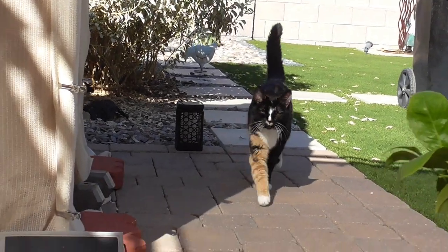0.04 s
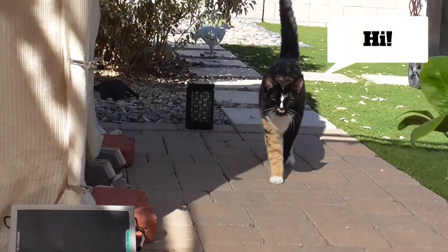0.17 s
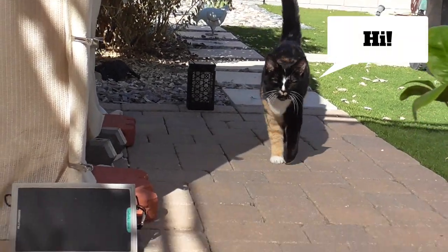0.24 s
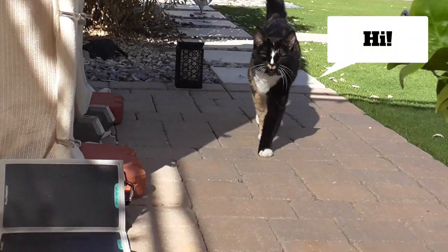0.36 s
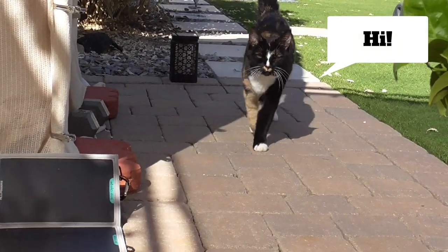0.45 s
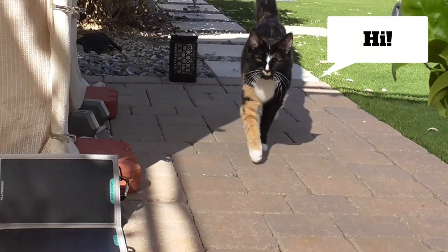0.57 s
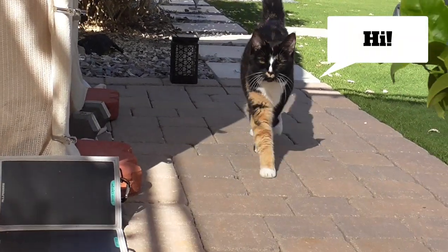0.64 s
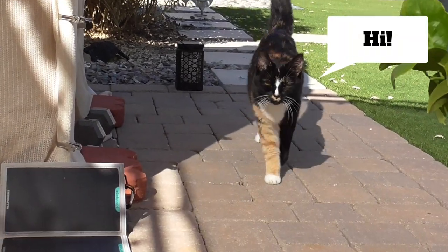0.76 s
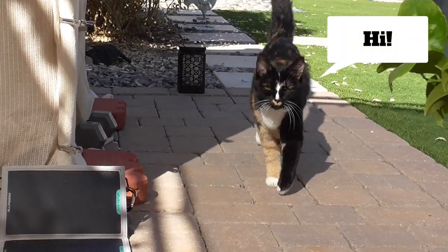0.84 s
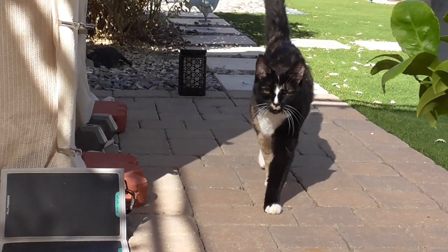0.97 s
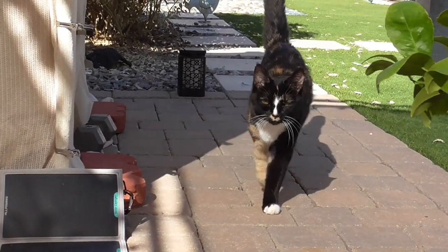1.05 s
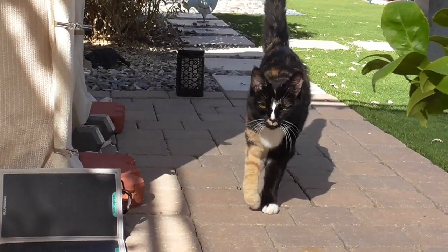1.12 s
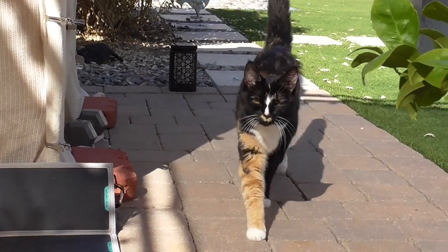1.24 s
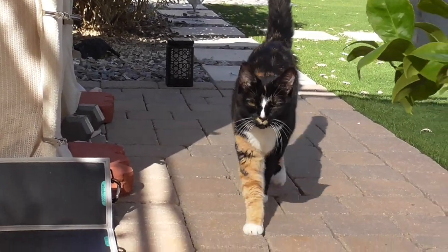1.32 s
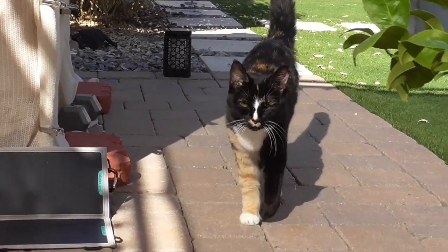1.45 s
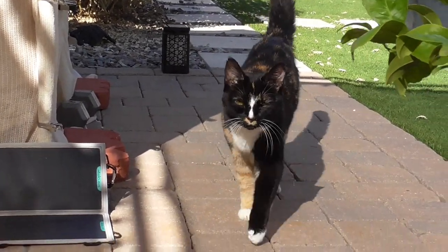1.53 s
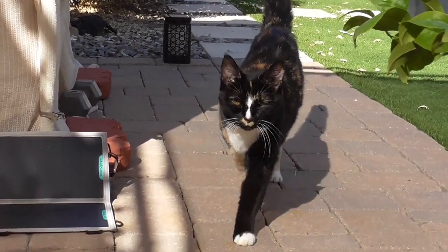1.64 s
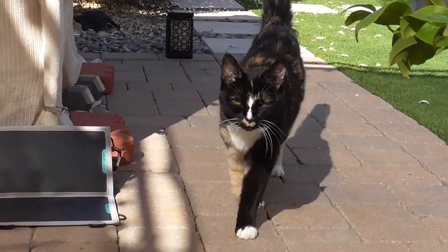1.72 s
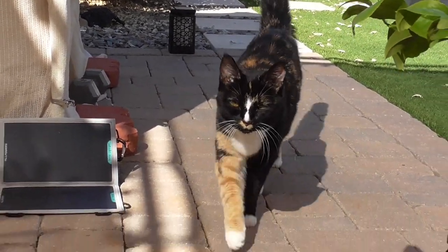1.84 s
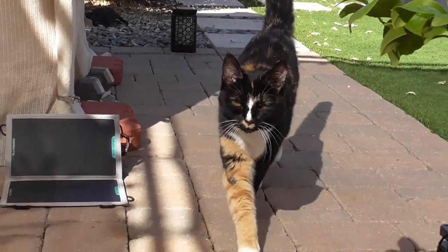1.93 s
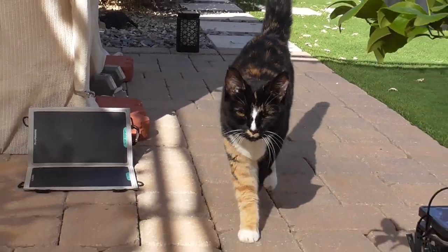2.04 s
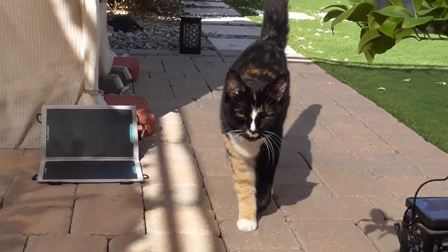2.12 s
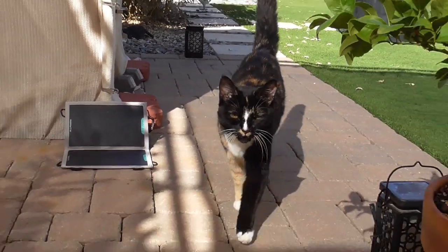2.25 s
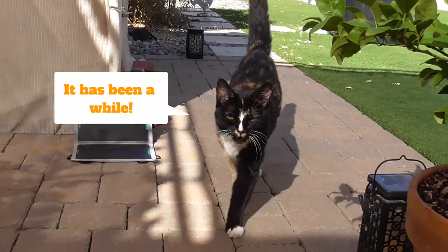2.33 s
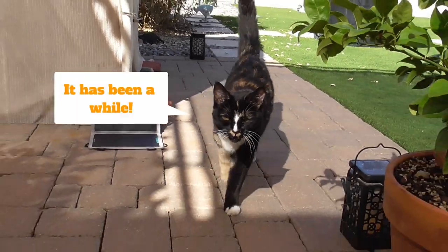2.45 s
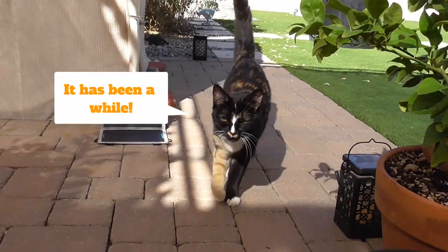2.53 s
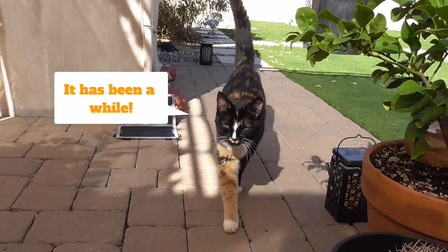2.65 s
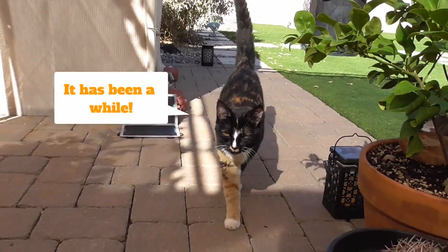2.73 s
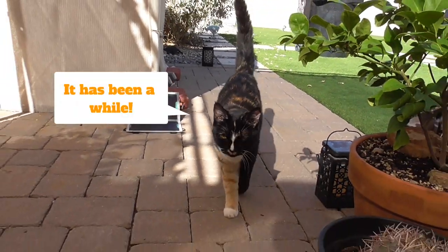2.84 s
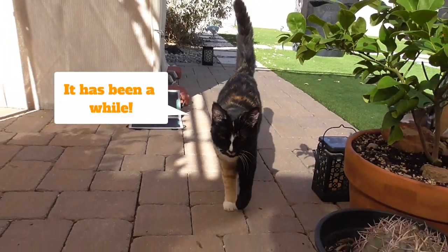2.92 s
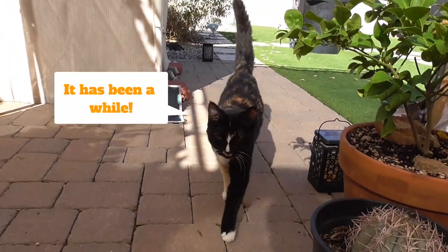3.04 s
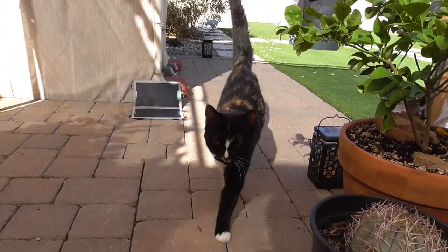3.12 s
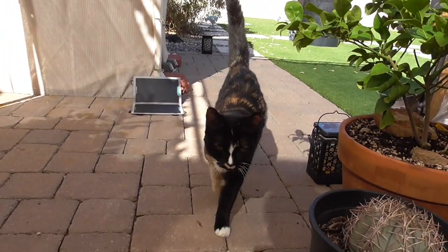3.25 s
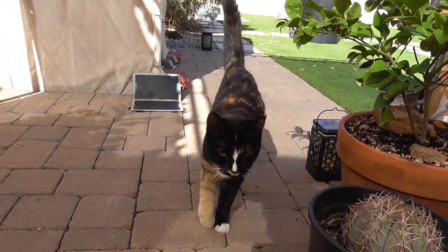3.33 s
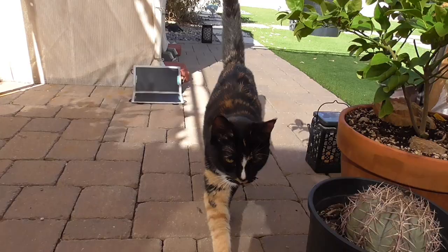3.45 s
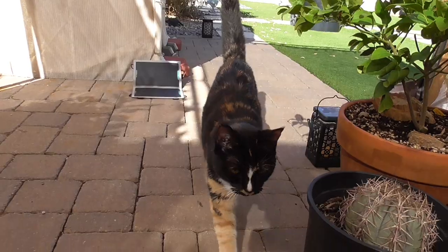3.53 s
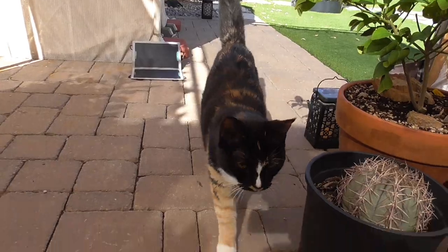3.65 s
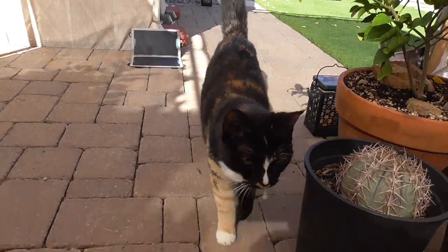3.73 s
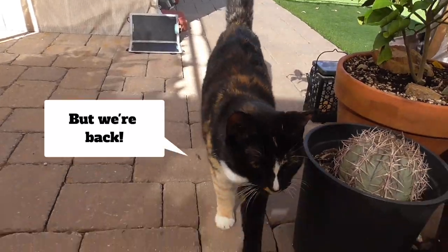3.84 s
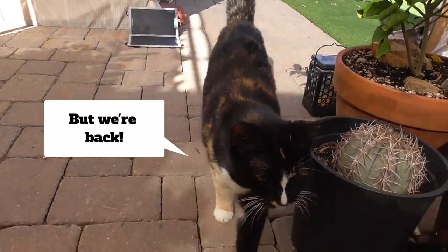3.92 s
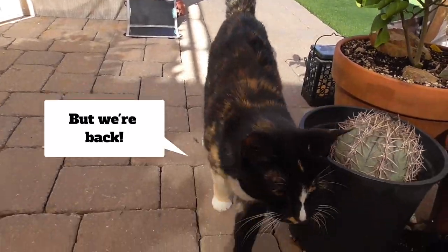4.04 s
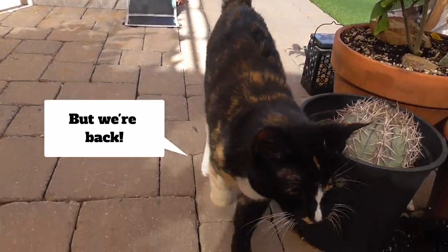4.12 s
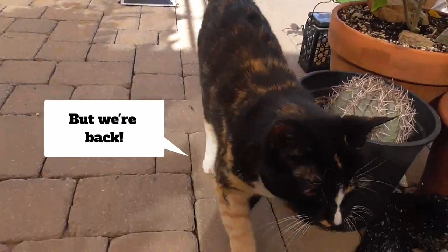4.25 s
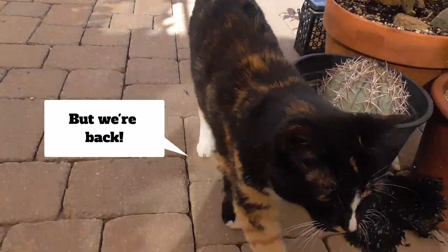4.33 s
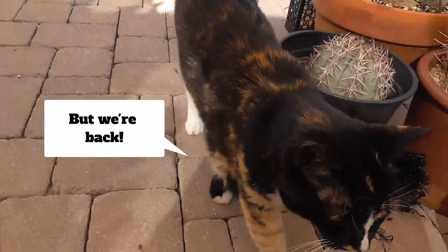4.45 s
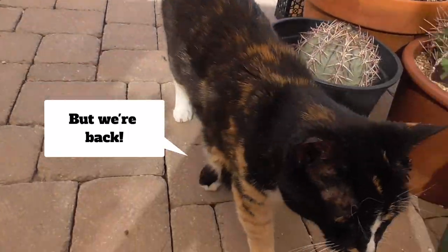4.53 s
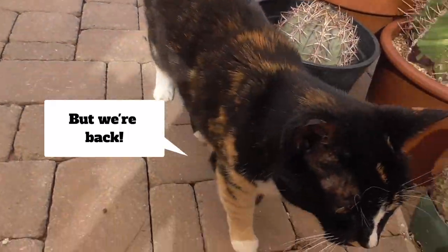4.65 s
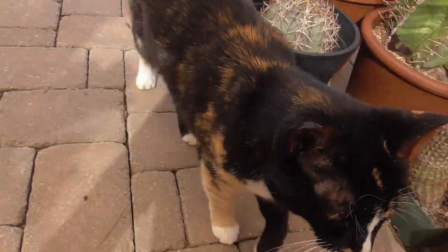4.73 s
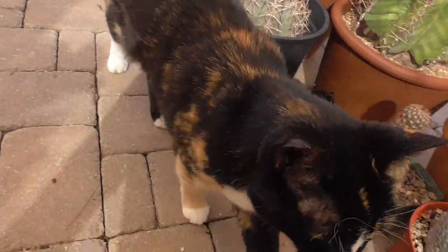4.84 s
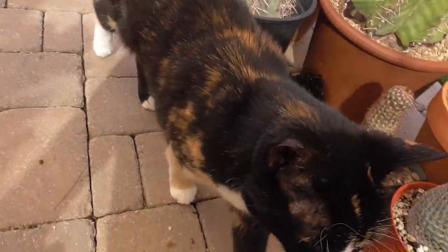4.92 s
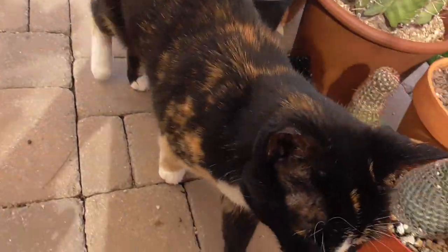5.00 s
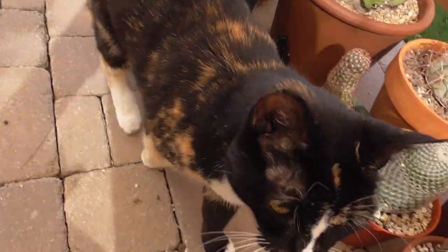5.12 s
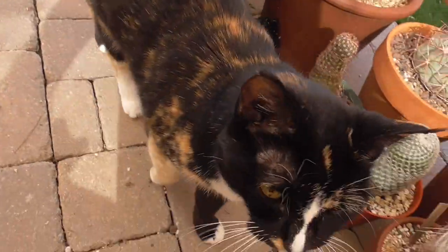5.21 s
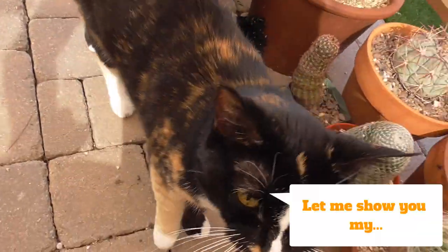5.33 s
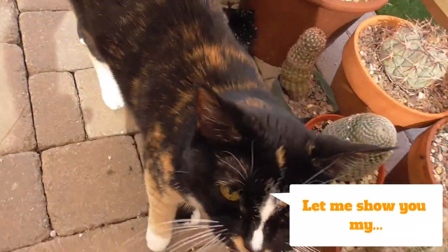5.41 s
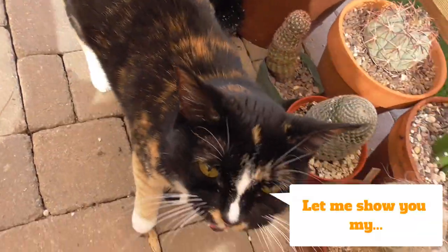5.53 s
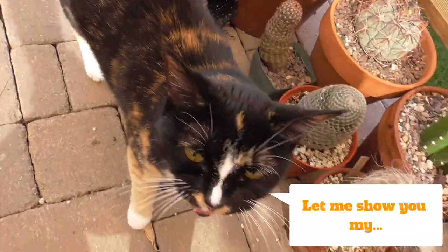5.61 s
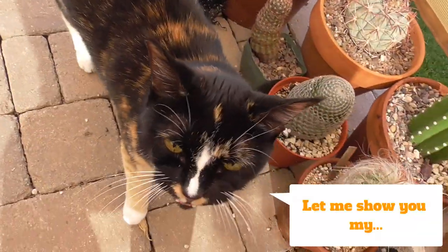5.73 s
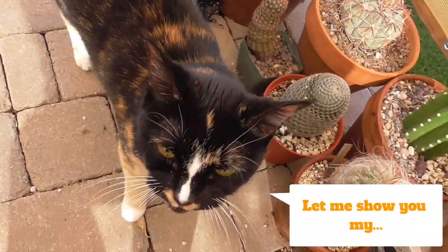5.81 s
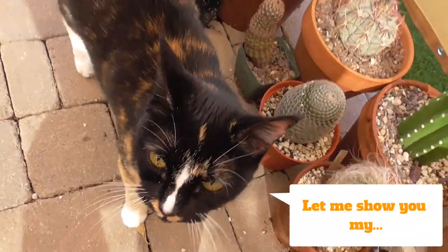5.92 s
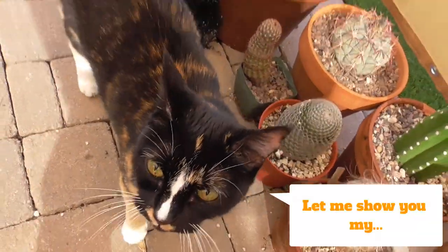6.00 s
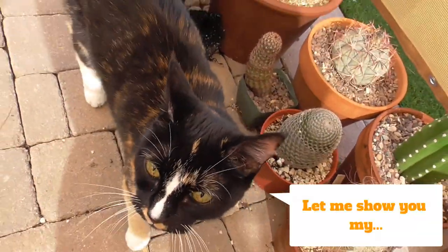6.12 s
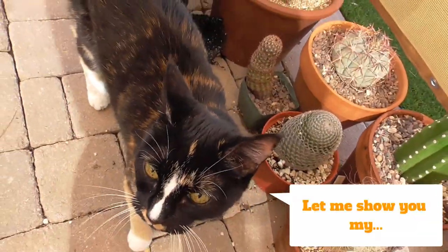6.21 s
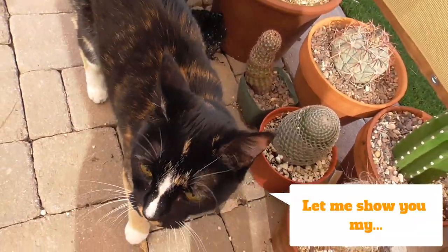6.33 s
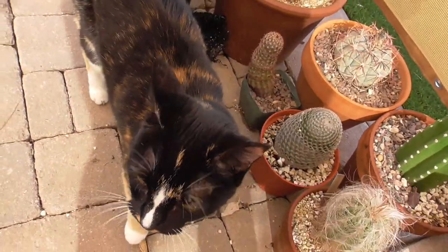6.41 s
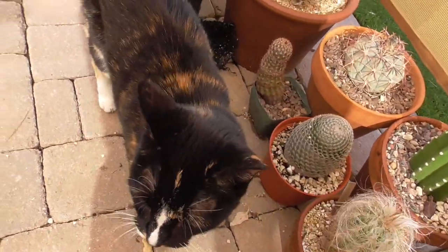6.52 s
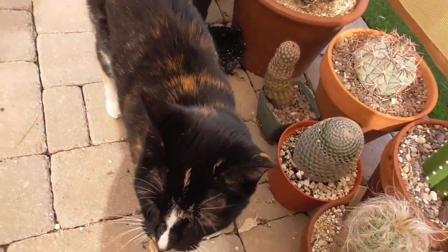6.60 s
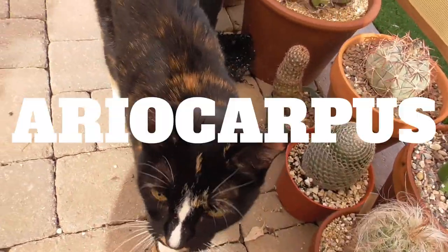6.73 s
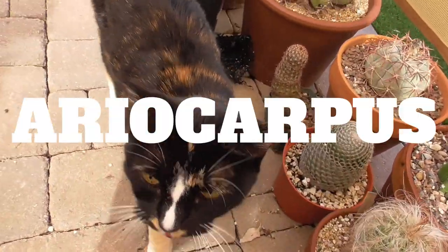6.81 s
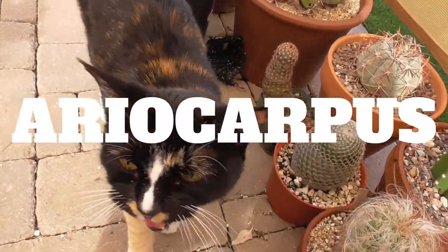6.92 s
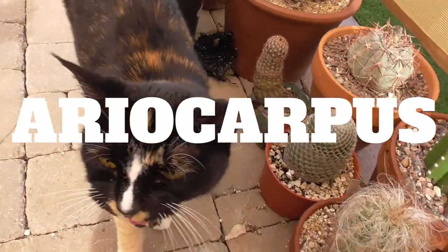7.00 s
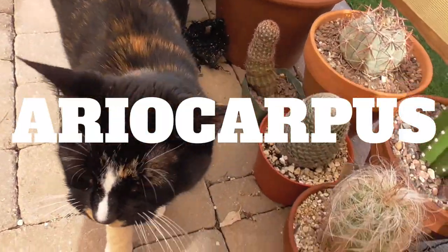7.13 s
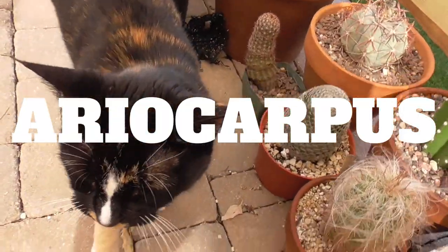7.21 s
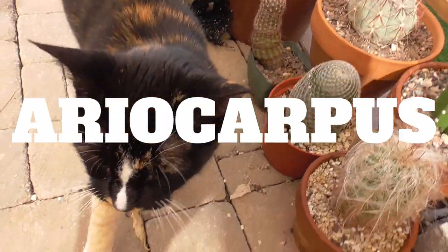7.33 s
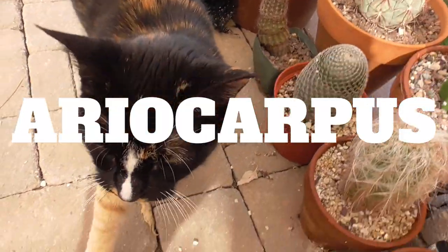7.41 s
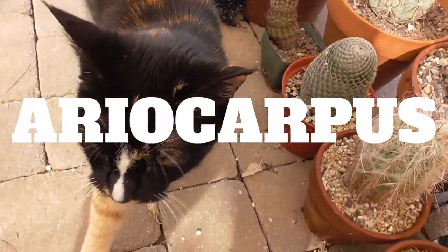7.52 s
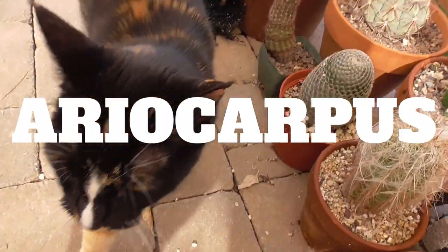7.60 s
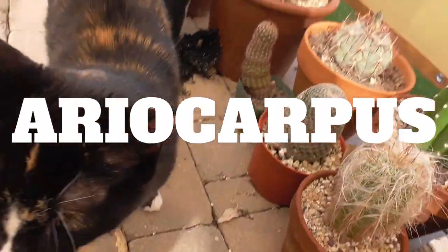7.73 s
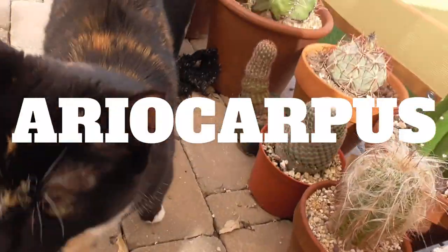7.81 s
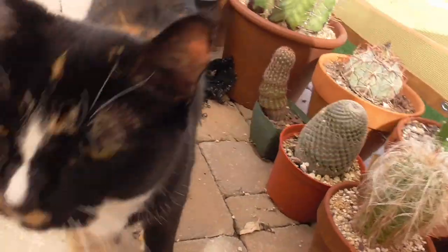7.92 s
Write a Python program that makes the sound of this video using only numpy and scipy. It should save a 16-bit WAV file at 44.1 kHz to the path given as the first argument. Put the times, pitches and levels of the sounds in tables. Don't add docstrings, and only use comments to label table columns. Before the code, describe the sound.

A house cat on a patio gives five meows, from a faint chirp to strained cries, as shoes scrape and crack grit nearby.

```python
import sys
import numpy as np
from scipy import signal
from scipy.fft import rfft, irfft
from scipy.io import wavfile
from scipy.ndimage import uniform_filter1d

SR = 44100
rng = np.random.default_rng(int(sys.argv[2]) if len(sys.argv) > 2 else 0)


def boost_factor(decibels):
    exponent = np.asarray(decibels, float) / 20
    return 10 ** exponent


def waveform_to_disk(signal):
    frames = np.transpose(np.atleast_2d(signal))
    scaled = np.clip(frames, -1, 1) * 32767
    samples = np.round(scaled).astype(np.int16)
    wavfile.write(sys.argv[1], SR, samples)


N = 351036
TIME = np.arange(N) / SR

# pitch_hz, level_db (per Hz)
TRAFFIC_COLOUR = [(12, -62), (22, -55), (69, -19.5), (136, -4.5), (179, -10.5), (481, -20), (1520, -28),
                  (1800, -42.5)]
# pitch_hz, level_db (per Hz)
AIR_COLOUR = [(900, -21.5), (1740, -38.5), (2600, -35), (2930, -40), (4550, -38), (6320, -42), (10100, -35),
              (14000, -44)]
# pitch_hz, likeness (0-1)
LEFT_RIGHT_LIKENESS = [(25, 0.12), (60, 0.89), (180, 0.88), (550, 0.12), (1650, 0.15), (4970, 0.12),
                       (15000, 0.03)]
# pitch_hz, left_minus_right_db
LEFT_RIGHT_LEAN = [(60, 0.5), (240, 1.5), (950, -1), (3770, 0), (15000, -2.5)]
YARD_DB = -48.5
PASSING_S, PASSING_HALF_S, PASSING_HZ, PASSING_WIDTH_HZ, PASSING_DB = 1.41, 0.29, 360, 82, 8

# centre_s, half_width_s, level_db
LOW_MACHINE_SWELLS = [
    (.3, 0.3, -38.5),
    (1.25, 0.52, -36.5),
    (3.5, 2.03, -45),
    (5.05, 0.28, -41.5),
    (6.6, 0.34, -42),
    (7.901, 0.52, -54),
]
# centre_s, half_width_s, level_db
HIGH_MACHINE_SWELLS = [
    (2.7, 0.12, -47),
    (4.999, 0.12, -42),
    (5.7, 0.32, -38.5),
    (6.6, 0.28, -42.5),
    (7.601, 0.39, -41.5),
]

# time_s, level_db
TICKING_LEVEL = [(0, -65.5), (1.6, -65.5), (2.0, -72), (3.3, -72), (4.5, -77), (7.96, -80)]
TICKS_PER_S, FIRST_TICK = 59.94, 0.5

# time_s, effort_db, jaw_opening (0-1), tongue_height (0-1),
# mouth_ring_db (over the effort)
GREETING_MOUTH = [(0.0, -62, 0.0, 0.1, -24), (0.028, -51.5, 0.3, 0.2, -40), (0.2, -50.5, 0.35, 0.1, -40),
                  (0.34, -52, 0.3, 0.0, -28), (0.386, -52, 0.38, 0.1, -12), (0.412, -58, 0.46, 0.2, 1)]
CHIRP_MOUTH = [(0.419, -42, 0.25, 0.29, 5), (0.452, -38.5, 0.22, 0.24, -0.5), (0.49, -53, 0.22, 0.14, -10),
               (0.512, -54, 0.11, 0.1, -30), (0.54, -64, 0.42, 0.0, -34), (0.56, -55, 0.3, 0.0, -34),
               (0.579, -64, 0.3, 0.0, -34)]
SECOND_MURMUR_MOUTH = [(2.0, -58, 0.028, 0.0014, -50), (2.03, -63, 0, 0, -45), (2.12, -64, 0, 0, -42),
                       (2.17, -57.5, 0.38, 0, -43), (2.3, -50.5, 0.51, 0, -19),
                       (2.345, -38.5, 0.73, 0, -34), (2.385, -44.5, 0.51, 0.05, -11),
                       (2.45, -42, 0.67, 0.049, -41), (2.503, -39, 0.64, .02, -37)]
SECOND_CALL_MOUTH = [(2.509, -32.5, 0.8, 0.98, -22), (2.553, -32.5, 0.91, 0.69, -9.5),
                     (2.64, -39, 0.78, 0.6, -18), (2.74, -40, 0.54, 0.36, -24), (2.82, -40, 0.34, 0.4, -17),
                     (2.85, -35, 0.41, 0.29, -27), (2.931, -37.5, 0.4, 0.21, -28),
                     (3.02, -45, 0.35, .1, -24), (3.094, -42.5, 0.46, 0.021, -51)]
THIRD_MURMUR_MOUTH = [(3.746, -52, 0.0, 0.0032, -53), (3.8, -45, 0.23, 0.0031, -32),
                      (3.845, -44, 0.27, 0.00053, -26), (3.9, -39, 0.27, 0, -26),
                      (3.935, -31.5, 0.32, 0.0017, -20)]
THIRD_CALL_MOUTH = [(3.958, -29, 0.53, 0.15, -13), (3.985, -31, 0.54, 0.59, -8.5),
                    (4.049, -30.5, 0.78, 0.89, -10), (4.256, -26.5, 0.69, 0.69, -15),
                    (4.357, -26.5, 0.68, 0.35, -31), (4.495, -36.5, 0.27, 0.021, -26),
                    (4.641, -37.5, 0.32, 0, -54)]
LOUD_CALL_MOUTH = [(5.323, -40.5, 0.035, 0.28, -1), (5.349, -33.5, 0.3, 0.38, 0.5),
                   (5.464, -29.5, 0.13, 0.75, -2.5), (5.538, -30, 0.061, 0.29, -4),
                   (5.66, -29, 0.22, 0.025, -7.5), (5.706, -27, 0.31, 0.21, -3),
                   (5.781, -26.5, 0.28, 0.29, -3.5), (5.845, -28, 0.29, 0.22, -2.5),
                    (5.9, -26, 0.63, 0.4, -9.5), (5.95, -26, 0.57, 0.42, -19),
                    (6.009, -25, 0.62, 0.91, -40), (6.06, -27.5, 0.57, 0.8, -30),
                    (6.098, -31, 0.52, 0.27, -15)]
LAST_CALL_MOUTH = [(6.895, -43, 0.46, 0.55, -47.6), (6.921, -37.5, 0.44, 0.13, -2.5),
                   (7.041, -30.5, 0.3, 0.9, -16.5), (7.14, -28.5, 0.29, 0.47, -1.5),
                   (7.26, -28, 0.34, 0.36, -5.5), (7.361, -29.5, 0.43, 0.2, 3.5),
                   (7.484, -23.5, 0.59, 0.0, -31), (7.614, -33, 0.23, 0.15, -77),
                   (7.676, -32.5, 0.26, 0.0, -16)]

# time_s, pitch_hz
GREETING_PITCH = [(0.0, 489), (0.062, 517), (0.15, 528), (0.332, 549), (0.41, 593), (0.443, 620),
                  (0.5, 600), (0.55, 533), (0.579, 512)]
# time_s, pitch_hz
PITCH_RISES = [
    [(2.0, 390.4), (2.064, 434.6), (2.08, 404), (2.122, 438), (2.152, 482.5), (2.254, 501.6), (2.456, 655),
     (2.5, 651)],
    [(3.742, 396), (3.77, 435), (3.792, 474), (3.836, 541.6), (3.858, 495), (3.868, 533), (3.876, 525),
     (4.05, 673)],
    [(5.328, 614), (5.438, 720.6), (5.48, 734.4)],
    [(6.894, 526), (6.955, 575), (6.99, 612), (7.025, 641), (7.055, 628), (7.095, 666)],
]
# time_s, pitch_hz
PITCH_FALLS = [
    [(2.505, 666), (2.601, 699), (2.745, 632.3), (2.925, 619.4), (2.947, 605), (3.007, 619), (3.053, 613),
     (3.077, 557), (3.093, 453)],
    [(4.06, 679.4), (4.172, 654), (4.18, 668), (4.478, 600), (4.5, 613), (4.586, 597), (4.63, 526),
     (4.639, 506)],
    [(5.7, 709.8), (5.8, 687.7), (5.962, 597), (6.032, 600), (6.066, 607.5), (6.096, 576)],
    [(7.11, 660), (7.33, 647), (7.484, 580.2), (7.634, 563.7), (7.678, 517)],
]
# time_s, pitch_hz
STRAINED_PITCH = [(2.315, 545.6), (2.345, 576.5), (2.392, 597.5), (5.53, 760), (5.622, 747.8), (5.66, 735),
                  (7.27, 658.5), (7.374, 620)]
# centre_s, half_width_s, pitch_share
HOARSE_SPOTS = [
    (2.47, .04, .012),
    (3.97, .04, .008),
    (4.15, .03, .008),
    (6.97, .07, .013),
]
# start_s, peak_db, pitch_hz, overtone_db, length_s
GULPS = [
    (3.096, -39, 372, -15, 0.015),
    (4.646, -34, 411, 3, 0.018),
    (6.097, -26, 475, -1.5, 0.019),
    (7.685, -26.5, 410, 2.5, 0.018),
]
TREMOR_SHARE, TREMOR_FROM_HZ, TREMOR_PER_S, TREMOR_TOP_S = 0.014, 705, 25, 5.523

# time_s, pitch_hz, level_db (over the effort)
NOSE_RESONANCE = [(0.3, 6700.0, -46), (0.439, 5780.0, -35), (0.558, 5500, -24), (2.3, 6000, -31),
                  (2.45, 5300.0, -28), (2.551, 7160, -25), (2.705, 5115, -30.5), (2.87, 5060, -32),
                  (3.04, 4780, -30.5), (3.85, 5970, -42), (3.96, 6300, -23.5), (4.128, 6940.0, -24),
                  (4.35, 6240, -25.5), (4.45, 6700, -26), (4.52, 6800, -32), (4.62, 6500, -29),
                  (5.377, 4597, -12.5), (5.467, 4740, -8), (5.684, 4610, -8), (5.744, 5750, -8.5),
                  (6.09, 7025, -23), (6.895, 6434, -10), (7.03, 5800, -11.5), (7.09, 6300, -13),
                  (7.17, 5930, -14.5), (7.236, 5800, -10), (7.3, 6350, -14), (7.38, 6220, -16),
                  (7.438, 6690, -25), (7.63, 8440, -23.5)]
# time_s, pitch_hz, level_db (over the effort)
THROAT_RESONANCE = [(2.62, 7300, -35), (2.8, 7250, -20.5), (3.03, 7600, -29), (4.42, 7010, -45),
                    (4.5, 7520, -31), (4.62, 6940, -30), (5.3, 4370, -37), (5.55, 4920, -14),
                    (5.72, 4500, -21), (5.8, 4360, -6), (5.88, 4110, -16), (5.93, 4284, -30),
                    (6.09, 3750, -24), (6.9, 3500, -14), (6.96, 3654, -9), (7.05, 4470, -8),
                    (7.2, 4540, -11.5), (7.24, 4090, -16), (7.34, 3950, -17), (7.39, 3950, -19),
                    (7.45, 3604, -60), (7.68, 3500, -66)]
# time_s, level_db
CHEST_LEVEL = [(0.2, 1), (0.45, -10), (2.05, 13), (2.25, 18.5), (2.35, -6.5), (2.6, 5), (3.0, -10),
               (3.8, -1.5), (3.9, -27), (4.05, 4.5), (4.4, -8.5), (4.6, -10), (5.4, 8), (6.0, 3),
               (6.95, 7.5), (7.1, 3.5), (7.35, 4.5), (7.6, -1.5)]
# time_s, spacing_hz, echo_share (0-1)
NEAR_ECHO = [(.44, 3080, 1), (2.5, 3070, 0), (2.64, 3080, 0.6), (2.76, 1097, 0.7), (3.0, 1082, .85),
             (3.9, 2600, 0.4), (4.1, 2295, 0.58), (4.4, 2300, 0.47), (4.5, 1410, 0.72), (5.35, 2238, 0.3),
             (5.46, 2260, 0.4), (5.55, 1900, 0), (5.65, 1870, 0.3), (5.7, 1393, 0.42), (5.76, 1388, 0.42),
             (5.85, 1193, 0.6), (6.05, 1140, 0.1), (6.92, 1424, 0), (7.07, 1240, 0), (7.17, 1298, 0.83),
             (7.22, 1314, 0), (7.28, 1550, 0.6), (7.36, 1515, 0.04), (7.47, 1423, 0.5), (7.62, 1470, 0.3)]
# time_s, left_minus_right_db
CAT_PAN = [(0.3, 2.5), (2.6, 1.5), (4.0, -1.5), (4.6, -5), (5.4, 2), (6.0, .5), (7.0, -1), (7.6, 2.5)]
JAW_SHUT_HZ, JAW_SPAN_HZ, JAW_WIDTH_HZ = 600, 1564, 534
TONGUE_LOW_HZ, TONGUE_SPAN_HZ, TONGUE_WIDTH_HZ = 2168, 1585, 502
CHEST_DB, CHEST_HZ, CHEST_DB_PER_JAW = -9, 955, -5
NOSE_WIDTH_HZ, FILL_DB, THROAT_WIDTH_HZ = 640, -6, 400
SINUS_HZ, SINUS_WIDTH_HZ, SINUS_DB = 6470, 180, -8
DIP_HZ, DIP_WIDTH_HZ, DIP_DEPTH = 1414, 270, 0.52
HOLLOW_HZ, HOLLOW_WIDTH_HZ, HOLLOW_DB_PER_JAW = 4600, 550, -17
EDGE_RING_HZ, EDGE_RING_DB, EDGE_RING_DB_PER_JAW = 9060, -33, 25
SHIMMER_DB = -28

# start_s, peak_db, pitch_hz
GRIT_CRACKS = [(0.3036, -33, 8170), (0.38, -39, 7690), (0.6604, -25.5, 7600), (0.712, -33, 12500),
               (0.771, -39.5, 7550), (0.9552, -44, 8070), (1.0135, -33, 6350), (1.0989, -38.5, 7840),
               (1.133, -37, 7620), (1.1615, -35, 7500), (1.1898, -31, 7410), (1.2551, -28.5, 7950),
               (1.2922, -40, 7860), (1.3121, -23.5, 8100), (1.388, -35.5, 7640), (1.605, -39.5, 8870),
               (1.667, -41.5, 9950), (1.862, -39, 10900), (3.029, -30.5, 8200), (3.598, -34.5, 4400),
               (3.876, -38, 7520), (3.8997, -35, 6240), (4.91, -38.5, 9600), (4.9794, -39.5, 8700),
               (5.117, -30, 8900), (5.154, -21.5, 9610), (5.315, -33, 10830), (5.3735, -29, 6580),
               (5.4652, -28, 8000), (5.733, -18, 9900), (5.841, -21, 6600), (6.0006, -9, 10480),
               (6.0906, -19.5, 7270), (6.1587, -27, 6000), (6.186, -22.5, 7900), (6.2053, -25, 10030),
               (6.2532, -27, 8000), (6.3055, -31, 7040), (6.3154, -34, 8930), (6.329, -30.5, 7000),
               (6.357, -30.5, 10400), (5.608, -19.5, 6630), (6.482, -27.5, 9100), (6.634, -21, 9000),
               (6.711, -26, 4150), (6.7322, -23.5, 10300), (6.794, -25, 7490), (6.976, -14, 6700),
               (6.9903, -12.5, 8500), (7.1043, -26, 6600), (7.1734, -29, 7830), (7.373, -29, 9010),
               (7.7359, -36, 7370), (7.8555, -33, 9260),
               (0.69, -44, 4000), (1.981, -46, 3491), (5.9405, -18, 10950), (5.956, -17, 10000),
               (5.9925, -23, 10500), (6.011, -18, 7000), (6.0252, -23, 11000), (6.035, -23, 8500),
               (6.0485, -28, 9000), (6.0955, -34, 6000), (6.637, -20.5, 8450), (6.651, -21, 9500),
               (5.75, -22, 9000), (6.395, -33, 8950), (0.329, -36.5, 6000), (7.667, -39, 4000),
               (4.785, -42, 2500), (5.129, -33, 4000), (6.739, -32, 9400), (6.7775, -45, 5000),
               (6.799, -26, 11200), (6.8497, -33, 11060), (6.855, -16, 10500), (6.895, -15.5, 4540)]
# start_s, peak_db, pitch_hz, fade_60db_s
KNOCKS = [
    (0.014, -33, 1010, 0.031),
    (3.597, -40.5, 900, 0.034),
    (5.284, -38, 372.9, 0.055),
    (6.184, -44, 405.3, 0.05),
    (6.614, -28, 360, 0.019),
    (6.653, -27, 254, 0.054),
    (6.892, -25, 900, 0.045),
    (0.556, -43, 600, 0.04),
    (1.735, -48, 1700, 0.05),
]
# start_s, length_s, level_db, brightness_db (per octave)
SOLE_DRAGS = [(0.08, 0.22, -56, -6.5), (0.292, 0.061, -57.5, 10), (0.418, 0.22, -54.5, 3),
              (0.654, 0.057, -54.5, 1), (3.077, 0.044, -60, 8), (3.536, 0.071, -53, -3),
              (4.635, 0.042, -52.5, 7.5), (5.298, 0.11, -44.5, 4.5), (5.35, 0.45, -49, 4.5),
              (5.602, 0.045, -44, 0), (5.734, 0.055, -56, 15), (5.785, 0.19, -48.5, 5),
              (5.922, 0.06, -43, 11), (5.944, 0.14, -30, 9.5), (6.06, 0.071, -34.5, -1.5),
              (6.095, 0.16, -46, 0), (6.45, 0.11, -64.5, 15.5), (6.604, 0.11, -45.5, -3.5),
              (6.727, 0.2, -45.5, 8), (6.832, 0.077, -37.5, 9), (6.902, 0.06, -36, 8),
              (6.942, 0.091, -41.5, 8), (6.99, 0.26, -55, 12), (7.662, 0.055, -44, -1)]
# pitch_hz, level_db (per Hz)
SCUFF_COLOUR = [(1470, -3.5), (2500, -6.5), (2750, -11), (4680, -4), (5600, -8), (8890, -7), (11400, -13),
                (14000, -22)]

EDGE_HZ, LEAK_DB = 14330, -19
SIDE_DROP_DB, SIDE_DROP_SHARE = -22, 33


def evened(x):
    return x / np.sqrt(np.mean(x ** 2) + 1e-20)


def read(points, hz):
    f, value = np.transpose(points)
    return np.interp(np.log(hz + 1), np.log(f + 1), value)


def follow(rows):
    s, *columns = np.transpose(rows)
    return np.array([np.interp(TIME, s, c) for c in columns])


def sides(pan_db):
    return boost_factor(np.array([pan_db / 2, -pan_db / 2]))


def add(mix, s, sound):
    part = mix[..., round(s * SR):][..., :sound.shape[-1]]
    part += sound[..., :part.shape[-1]]


def highpass(x, order, hz):
    return signal.sosfilt(signal.butter(order, hz, "high", fs=SR, output="sos"), x)


def resonate(x, hz, width):
    turn = np.exp(2j * np.pi * hz * np.arange(x.shape[-1]) / SR)
    r = np.exp(-np.pi * width / SR)
    return 2 * (turn * signal.lfilter([1 - r], [1, -r], x / turn)).real


def hump(hz, centre_hz, width_hz):
    return 1 / (1 + ((hz - centre_hz) / width_hz) ** 2) ** 2


def bump(t, centre_s, half_s):
    return np.exp(-((t - centre_s) / half_s) ** 2)


def wander(size):
    return evened(uniform_filter1d(uniform_filter1d(rng.standard_normal(N), size), size))


def ports(a, b):
    side = highpass(b, 2, 6000)
    return np.array([a + 0.62 * side, a - 0.68 * side])


def yard():
    frames, hz = N // 512 + 5, np.fft.rfftfreq(2048, 1 / SR)
    a, b, c, d, patches = rng.standard_normal((frames, 1025, 5)).T
    patches = uniform_filter1d(uniform_filter1d(patches, size=20, axis=0), size=8, axis=1)
    same = np.clip(read(LEFT_RIGHT_LIKENESS, hz), -1, 1)[:, None]
    left = a + 1j * b
    right = same * left + np.sqrt(1 - same ** 2) * (c + 1j * d)
    z = np.array([left, right])
    t = np.arange(frames) * 512 / SR
    car_colour = hump(hz, PASSING_HZ, PASSING_WIDTH_HZ)[:, None]
    z *= boost_factor(PASSING_DB * car_colour * bump(t, PASSING_S, PASSING_HALF_S))
    colour = np.hypot(boost_factor(read(TRAFFIC_COLOUR, hz)), boost_factor(read(AIR_COLOUR, hz)))
    z *= colour[:, None] * boost_factor(1.7 * evened(patches)) * sides(read(LEFT_RIGHT_LEAN, hz))[:, :, None]
    return evened(signal.istft(z, nperseg=2048, noverlap=1536)[1][:, :N]) * boost_factor(YARD_DB)


def drone():
    out = 0
    for hz, swells in [(127.0, LOW_MACHINE_SWELLS), (155.0, HIGH_MACHINE_SWELLS)]:
        level = sum(boost_factor(db - 10) * bump(TIME, s, half) for s, half, db in swells)
        line = np.sin(2 * np.pi * np.cumsum(hz * (1 + 0.01167 * wander(size=9000))) / SR)
        fuzz = resonate(resonate(rng.standard_normal(N), hz, 3.9), hz, 3.9)
        out = out + level * evened(line + 0.28 * evened(fuzz))
    return out * sides(2.5)[:, None]


def ticking():
    ticks = np.diff(np.floor(TIME * TICKS_PER_S + 1 - FIRST_TICK), prepend=0)
    ticks = ticks * boost_factor(1.5 * wander(size=300))
    modes = [(2300, 0), (4700, -4), (1550, -2)]  # pitch_hz, level_db
    ring = sum(boost_factor(db) * resonate(resonate(ticks, hz, 750), hz, 750) for hz, db in modes)
    return evened(ring) * boost_factor(follow(TICKING_LEVEL)[0])


def cat_pitch():
    points = sum(PITCH_RISES + PITCH_FALLS, GREETING_PITCH + STRAINED_PITCH)
    hz = follow(sorted(map(tuple, points)))[0]
    strain = np.clip((hz - TREMOR_FROM_HZ) / 40, 0, 1)
    shake = TREMOR_SHARE * strain * np.cos(2 * np.pi * TREMOR_PER_S * (TIME - TREMOR_TOP_S))
    hz = hz * (1 + shake + 0.0022 * wander(size=400) + 0.003 * wander(size=90))
    hoarse = sum(share * bump(TIME, s, half) for s, half, share in HOARSE_SPOTS)
    return hz * (1 + wander(size=250) * hoarse)


def cat_resonances(f, on, jaw, tongue, ring_db):
    nose_hz, nose_db = follow(NOSE_RESONANCE)[:, on]
    throat_hz, throat_db = follow(THROAT_RESONANCE)[:, on]
    chest_db = CHEST_DB + CHEST_DB_PER_JAW * jaw + follow(CHEST_LEVEL)[0][on]
    tract = hump(f, JAW_SHUT_HZ + JAW_SPAN_HZ * jaw, JAW_WIDTH_HZ) ** 1.63
    tract += boost_factor(chest_db) / (1 + (f / CHEST_HZ) ** 4)
    tract += boost_factor(ring_db) * hump(f, TONGUE_LOW_HZ + TONGUE_SPAN_HZ * tongue, TONGUE_WIDTH_HZ) ** 1.09
    head = hump(f, nose_hz, NOSE_WIDTH_HZ) + boost_factor(FILL_DB) / (1 + (f / 6500) ** 6)
    head += boost_factor(SINUS_DB) * hump(f, SINUS_HZ, SINUS_WIDTH_HZ)
    head += boost_factor(EDGE_RING_DB + EDGE_RING_DB_PER_JAW * jaw) * hump(f, EDGE_RING_HZ, 1100)
    head *= boost_factor(HOLLOW_DB_PER_JAW * jaw * hump(f, HOLLOW_HZ, HOLLOW_WIDTH_HZ))
    tract += boost_factor(nose_db) * head + boost_factor(throat_db) * hump(f, throat_hz, THROAT_WIDTH_HZ)
    return tract * (1 - DIP_DEPTH / (1 + ((f - DIP_HZ) / DIP_WIDTH_HZ) ** 2))


def near_echo(f, on):
    spacing_hz, share = follow(NEAR_ECHO)[:, on]
    back = np.clip(share, 0, 0.95) / (1 + (2800 / f) ** 12)
    return abs(1 - back * np.exp(2j * np.pi * f / spacing_hz)) / np.sqrt(1 + back ** 2)


def add_gulps(voice):
    for s, db, gulp_hz, over_db, length in GULPS:
        u = np.arange(0, 1, 1 / (SR * length))
        turn = 2 * np.pi * gulp_hz * length * (1.065 * u - 0.12 * u ** 2)
        tone = np.sin(turn) + boost_factor(over_db) * np.sin(2 * turn)
        add(voice, s, boost_factor(db + 1.5) * np.sin(np.pi * u ** 0.4) * tone)


def cat():
    calls = [GREETING_MOUTH + CHIRP_MOUTH, SECOND_MURMUR_MOUTH + SECOND_CALL_MOUTH,
             THIRD_MURMUR_MOUTH + THIRD_CALL_MOUTH, LOUD_CALL_MOUTH, LAST_CALL_MOUTH]
    voiced = np.zeros(N, bool)
    for rows in calls:
        voiced |= (TIME >= rows[0][0] + 0.005) & (TIME <= rows[-1][0] + 0.006)
    on = np.flatnonzero(voiced)
    effort_db, jaw, tongue, ring_db = follow(sum(calls, []))[:, on]
    nose_hz, nose_db = follow(NOSE_RESONANCE)[:, on]
    hz = cat_pitch()
    angle = (2 * np.pi * np.cumsum(hz) / SR)[on]
    k = np.arange(1, 18)[:, None]
    f = k * hz[on]
    upper = k > 3
    gain = cat_resonances(f, on, jaw, tongue, ring_db)
    gain *= boost_factor((0.4 + 0.16 * k) * upper * wander(size=500)[(on + 20011 * k) % N])
    gain *= near_echo(f, on)
    gain *= 1 + boost_factor(SHIMMER_DB) * upper * wander(size=30)[on]
    partials = (gain * np.cos(k * angle + 0.27 * k ** 2 * upper)).sum(0)
    rasp = uniform_filter1d(rng.standard_normal(len(on)), size=30)
    rasp = rasp * np.cos(2 * np.pi * np.cumsum(nose_hz) / SR)
    voice = np.zeros(N)
    voice[on] = np.sqrt(2) * boost_factor(effort_db) * (partials + boost_factor(nose_db - 19) * evened(rasp))
    voice *= uniform_filter1d(voiced * 1.0, size=200) ** 2 * boost_factor(0.06 * wander(size=300))
    add_gulps(voice)
    return highpass(voice, 2, 150)


def patio(x):
    t = np.arange(4000) / SR
    taps = rng.standard_normal((2, 4000)) * (rng.random((2, 4000)) < 0.05)
    taps = taps * boost_factor(-60 * t / 0.091) * (t > 0.002)
    taps = taps + 1.2 * taps[::-1].mean(0)
    both = highpass(taps.mean(0), 1, 1500)
    taps = both + highpass(taps - both, 2, 1200)
    return signal.oaconvolve(x[None], taps / np.linalg.norm(taps[0]), axes=1)[:, :N]


def cracks():
    out, t = np.zeros((2, N)), np.arange(2000) / SR
    for s, db, hz in GRIT_CRACKS:
        fade = boost_factor(-60 * t / 0.03) + 2.2 * boost_factor(-60 * t / 0.004)
        burst = ports(*resonate(rng.standard_normal((2, 2000)) * fade, hz, 4000))
        burst = signal.lfilter([1, -1], [1, -0.7], burst)
        add(out, s, boost_factor(db + 1.5) * burst / abs(burst).max())
    for s, db, hz, fade_s in KNOCKS:
        noise = rng.standard_normal(2000) * boost_factor(-60 * t / fade_s)
        thud = resonate(resonate(noise, hz, 1.05 * hz), hz, 1.05 * hz)
        add(out, s, boost_factor(db) * np.array([thud, thud]) / abs(thud).max())
    return out


def scuff():
    grains = boost_factor(5.3 * np.minimum(rng.exponential(1, N), 5)) * (rng.random(N) < 1500 / SR)
    size = signal.lfilter([1], [1, -0.96], grains) + 3.8
    hz = np.fft.rfftfreq(N, 1 / SR)
    grit = ports(*rng.standard_normal((2, N)) * size)
    colour = boost_factor(read(SCUFF_COLOUR, hz)) * sides(1.3 * read(LEFT_RIGHT_LEAN, hz))
    grit = evened(irfft(rfft(grit) * colour, N))
    out = np.zeros((2, N))
    for s, length, db, tilt_db in SOLE_DRAGS:
        part = grit[:, round(s * SR):][:, :round(length * SR)]
        count = part.shape[1]
        octaves = np.log2(np.fft.rfftfreq(count, 1 / SR) / 7000 + 0.57)
        part = irfft(rfft(part) * boost_factor(tilt_db * octaves), count)
        add(out, s, boost_factor(db) * part * signal.windows.tukey(count, 0.8))
    return out


def masked(x):
    middle_and_side = np.array([x[0] + x[1], x[0] - x[1]]) / 2
    hz, _, z = signal.stft(middle_and_side, SR, nperseg=1024, noverlap=768)
    band = uniform_filter1d(uniform_filter1d(abs(z) ** 2, size=3, axis=1), size=7, axis=2)
    treble = (hz > 1400) & (hz < 12000)
    limit = uniform_filter1d(band[0], size=25, axis=0) * boost_factor(-50) + np.percentile(band[0][treble], 2)
    z *= np.where((band[0] < limit) & treble[:, None], boost_factor(-16), 1)
    presence = (hz > 1100) & (hz < 7000)
    side = uniform_filter1d(band[1], size=4, axis=0)
    limit = uniform_filter1d(band[0], size=61, axis=0) * boost_factor(2 * SIDE_DROP_DB)
    limit = limit + np.percentile(side[presence], SIDE_DROP_SHARE)
    z[1] *= np.where((side < limit) & presence[:, None], boost_factor(-40), 1)
    top = (abs(z[0][hz > 12000]) ** 2).mean(0)
    snap = top > 2.5 * uniform_filter1d(top, size=25)
    above = hz > EDGE_HZ
    z[:, above] *= boost_factor(LEAK_DB - (hz[above, None] - EDGE_HZ) / 150) * snap
    mid, side = signal.istft(z, nperseg=1024, noverlap=768)[1][:, :N]
    return np.array([mid + side, mid - side])


def scene():
    background = yard() + drone() + ticking()
    voice = cat()
    cat_in_yard = voice * sides(follow(CAT_PAN)[0]) + boost_factor(-10) * patio(voice)
    return background + cat_in_yard + cracks() + scuff()


def low_pass(x):
    return signal.sosfilt(signal.butter(12, 15620, fs=SR, output="sos"), x)


def record(dry):
    return low_pass(masked(dry))


dry = scene()
out = record(dry)
waveform_to_disk(out)
```